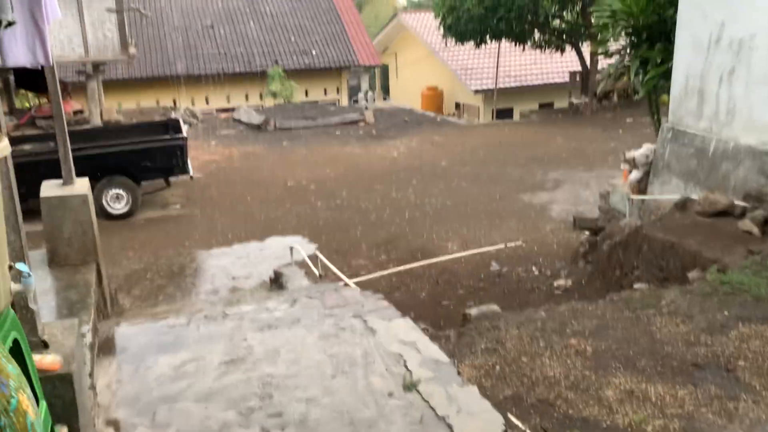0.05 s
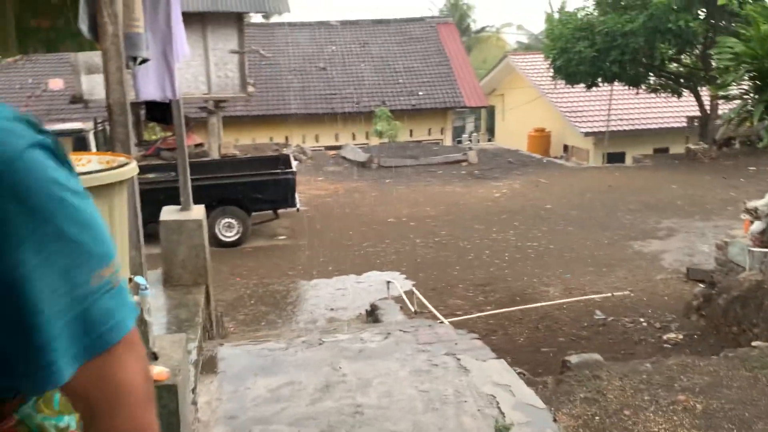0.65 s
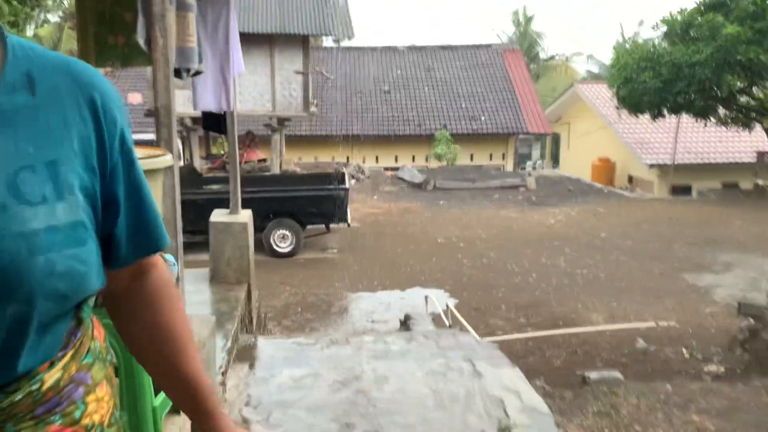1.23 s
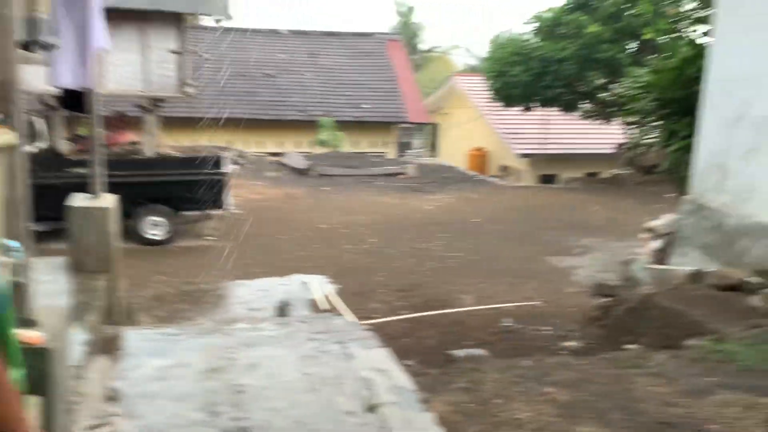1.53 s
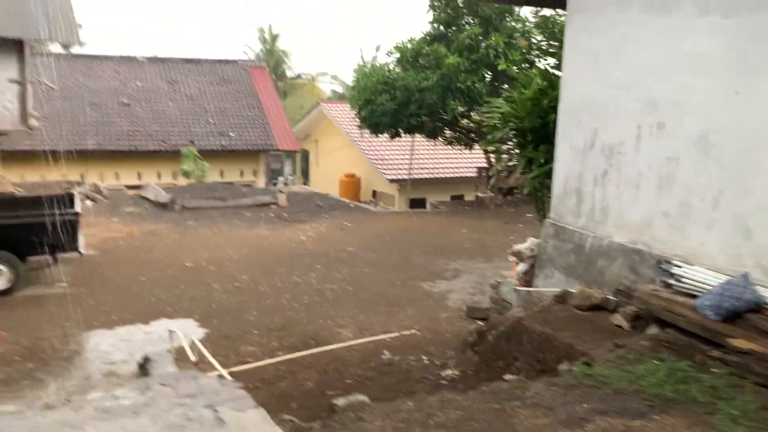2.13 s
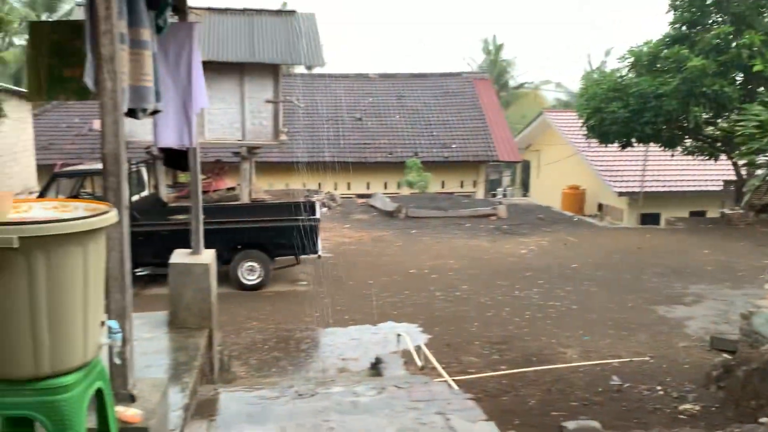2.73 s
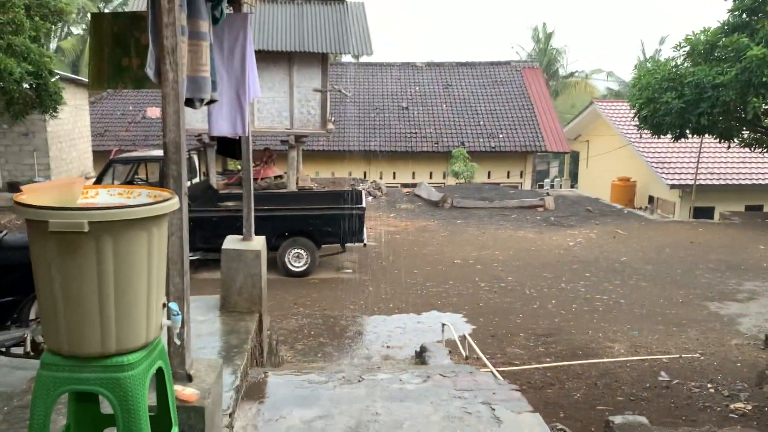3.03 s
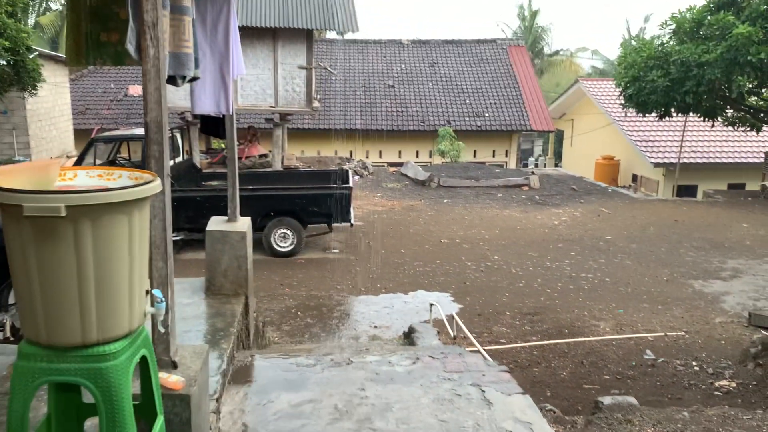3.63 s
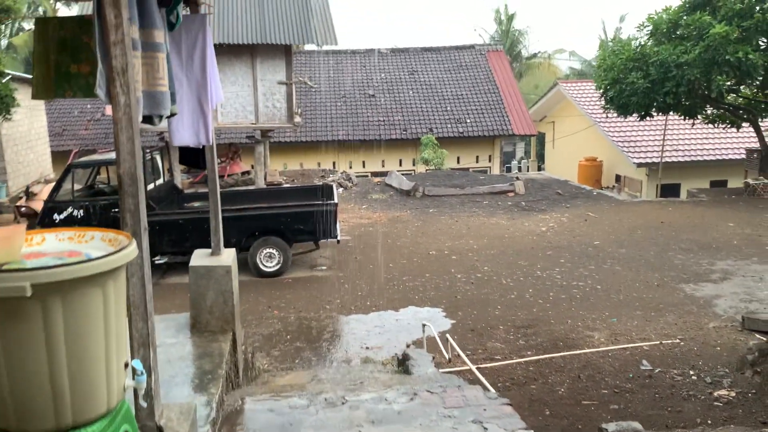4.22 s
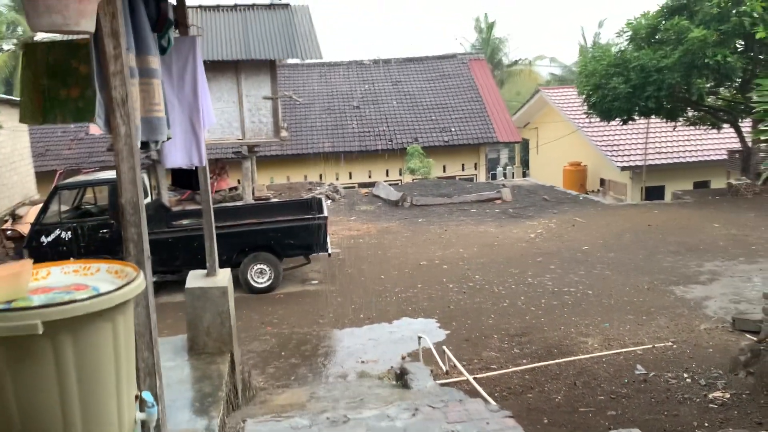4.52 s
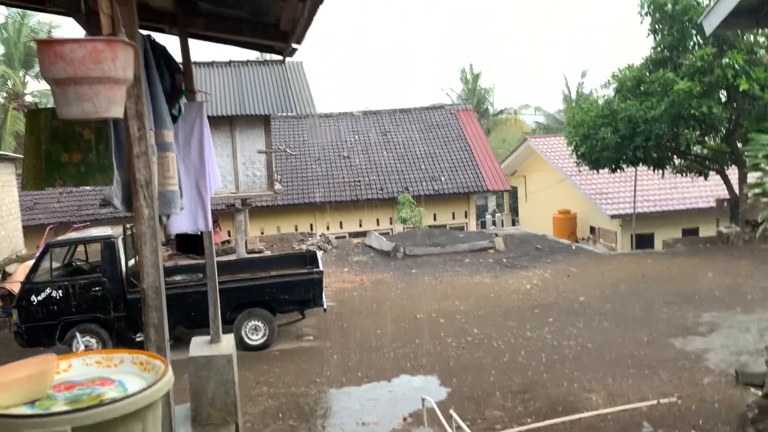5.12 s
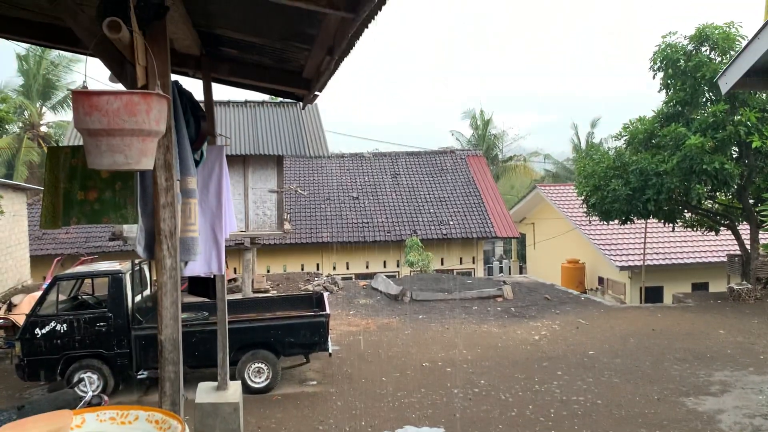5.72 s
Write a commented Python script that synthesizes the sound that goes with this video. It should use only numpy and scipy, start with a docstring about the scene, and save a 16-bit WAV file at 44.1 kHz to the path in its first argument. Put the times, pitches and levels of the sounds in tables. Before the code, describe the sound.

Slowly easing rain on rooftops, mud and puddles, heard from under the eaves, with sharp nearby drips over a faint rumble.

```python
"""A muddy village yard in steady, slowly easing rain, heard from under the eaves.
Drops drum the roofs into a hollow roar, patter on mud and wet concrete, and trap plinking air
bubbles in the puddles. A low rumble lies underneath. Close by, bigger drips smack down and two
drops plop into a puddle. Two microphone ports hear it all, with a lag that depends on pitch."""
import sys
import numpy as np
from scipy import signal
from scipy.fft import rfft, irfft, next_fast_len
from scipy.io import wavfile

SR = 44100
rng = np.random.default_rng(int(sys.argv[2]) if len(sys.argv) > 2 else 0)


def store_pcm(level_fs):
    """Save levels as 16-bit WAV."""
    pcm = np.round(np.clip(level_fs, -1, 1) * 32767).astype(np.int16)
    wavfile.write(sys.argv[1], SR, np.atleast_2d(pcm).T)


N = 258426
TIME = np.arange(N) / SR
FFT_SIZE = next_fast_len(N + 4096)
BINS_HZ = np.maximum(np.fft.rfftfreq(FFT_SIZE, 1 / SR), 1)


def from_db(db):
    """Decibels to gain."""
    return 10 ** (np.asarray(db) / 20)


def rms_one(x):
    """Scale to unit rms."""
    return x / np.sqrt(np.mean(x ** 2) + 1e-20)


def curve(points):
    """Draw a curve through (Hz, value) points on a log-frequency axis, one value per bin."""
    hz, values = np.transpose(points)
    return np.interp(np.log(BINS_HZ), np.log(hz), values)


def colour(x, gain):
    """Equalise with one gain per frequency bin."""
    return irfft(rfft(x, FFT_SIZE) * gain, FFT_SIZE)[..., :N]


def drift(rate_hz, hop=40):
    """A smooth random wander of unit rms, mostly slower than rate_hz."""
    pole = np.exp(-2 * np.pi * rate_hz * hop / SR)
    noise = rng.standard_normal(N // hop + 2002)
    slow = signal.lfilter([1], [1, -2 * pole, pole * pole], noise)[2000:]  # skip the filter's run-in
    return np.interp(np.arange(N) / hop, np.arange(len(slow)), rms_one(slow))


def easing(start_db, hold_s, db_per_s):
    """A fader in dB that holds, then sinks steadily."""
    return start_db - db_per_s * np.maximum(TIME - hold_s, 0)


def surges(rows):
    """A fader in dB made of bell-shaped swells and dips."""
    return sum(db * np.exp(-((TIME - s) / half_s) ** 2) for s, half_s, db in rows)


def add(out, sound, s):
    """Mix a short sound in at s seconds."""
    start = int(s * SR)
    slot = out[..., start:start + sound.shape[-1]]
    slot += sound[..., :slot.shape[-1]]


def impacts(per_s, spread_db):
    """Two independent streams of randomly timed drop hits: many small, a few large."""
    sizes = from_db(spread_db * np.minimum(rng.exponential(1, (2, N)), 4))
    hits = rng.random((2, N)) < per_s / SR
    return hits * sizes * rng.choice([-1, 1], (2, N))


def resonance(x, hz, width_hz):
    """A two-pole ring with unity gain at its peak."""
    r = np.exp(-np.pi * width_hz / SR)
    feedback = [1, -2 * r * np.cos(2 * np.pi * hz / SR), r * r]
    return signal.lfilter((1 - r * r) / 2 * np.array([1, 0, -1]), feedback, x + 1e-18)


def roofs(level_db=-4, swell_db=1.58, low_hz=110, high_hz=830):
    """Drops drum on the roofs; each hollow resonance takes its own hits and eases in its own time."""
    # Roof resonances. Each row: pitch in Hz, width in Hz, drive in dB, start of easing in seconds.
    modes = [(158.6, 63, -4, 1.03), (281, 51, -4, 2.2), (323, 26, -9.5, 2.3), (365, 36, -5, 1.95),
             (417.6, 45, -1.9, 1.2), (481.6, 39, 0.5, 0.51), (555, 55, -3, 0.95), (633, 62, -12.5, 2.4),
             (701, 57, -12, 3.3)]
    # Surges and lulls of the rain. Each row: middle in seconds, half length in seconds, change in dB.
    rain_surges = [(.58, 0.28, 0.6), (.81, 0.06, -2), (1.08, .16, 0.5), (1.8, 0.62, -1.6),
                   (4.45, 0.17, -2.5), (4.69, 0.048, 3), (5.55, 0.37, -1)]
    roar = 0
    for hz, width_hz, drive_db, hold_s in modes:
        blows = rms_one(impacts(per_s=2500, spread_db=3.0))
        blow_db = easing(drive_db, hold_s, db_per_s=1.5) + swell_db * drift(rate_hz=8.4)
        roar = roar + resonance(from_db(blow_db) * blows, hz, width_hz)
    # soft drops on a light sheet: no treble and no deep bass
    roar = signal.sosfilt(signal.butter(6, high_hz, "low", fs=SR, output="sos"), roar)
    roar = signal.sosfilt(signal.butter(3, low_hz, "high", fs=SR, output="sos"), roar)
    return from_db(level_db + surges(rain_surges)) * roar


def bubble(hz, cycles, rise=0.0184):
    """An air bubble trapped by a drop rings down to 1/e in `cycles` periods as its pitch creeps up."""
    age = np.arange(0, 6, hz / cycles / SR)  # in decay times
    return np.exp(-age) * np.sin(2 * np.pi * cycles * (age + rise * age ** 2 / 2))


def puddles(per_s=700, low_hz=1200, high_hz=4800, ring_s=0.018, range_db=14):
    """Small bubbles plink all over the flooded ground."""
    out = np.zeros((2, N))
    for when, pitch, size, stream in rng.random((int(per_s * N / SR), 4)):
        hz = low_hz + (high_hz - low_hz) * pitch
        plink = from_db(range_db * size ** 2) * bubble(hz, cycles=ring_s * hz)
        add(out[int(2 * stream)], plink, when * N / SR)
    return rms_one(out)


def yard(splash_s=0.00057, low_hz=660, top_hz=15100, spray_hz=5800, spray_follow=0.55):
    """Far drops merge into a wash; nearer ones stay separate splashes and bubbles."""
    # The tone of rain on mud and concrete. Each row: frequency in Hz, gain in dB.
    tone = [(800, 0.5), (1000, 0.6), (1550, 0), (1900, -2.5), (2550, -2.5), (2900, -9), (3700, -12),
            (5000, -19), (6500, -20.5), (7600, -22), (9500, -22.5), (11000, -26.5), (12700, -30.5),
            (13700, -26), (15000, -47)]
    wash = rng.standard_normal((2, N))
    hits = impacts(per_s=7000, spread_db=4.5)
    splash_energy = signal.lfilter([1], [1, -np.exp(-1 / (splash_s * SR))], hits ** 2 + 1e-18)
    splashes = rms_one(np.sqrt(splash_energy) * rng.standard_normal((2, N)))
    drops = wash + from_db(-7.5) * splashes + from_db(-10) * puddles()
    band = 1 / np.sqrt(1 + (low_hz / BINS_HZ) ** 12 + (BINS_HZ / top_hz) ** 120)
    patter = rms_one(colour(drops, from_db(curve(tone)) * band))
    level_db = easing(start_db=-29, hold_s=2.34, db_per_s=1.64)
    # the fine spray from close by fades less than the broad wash as the shower eases
    spray = colour(patter, 1 / (1 + (spray_hz / BINS_HZ) ** 6))
    spray_db = level_db + (1 - spray_follow) * (np.median(level_db) - level_db)
    return (patter - spray) * from_db(level_db) + spray * from_db(spray_db)


def low_rumble(level_db=-38.5, lumpy_db=2.5):
    """A bed of deep noise that swells unevenly and dips twice near the end."""
    # The rumble's tone. Each row: frequency in Hz, gain in dB.
    tone = [(12, -32), (20, -30), (30, -19), (45, -3.5), (65, -1.5), (95, -1), (130, -1), (200, -14),
            (400, -50), (1000, -100)]
    # Its fader moves. Each row: middle in seconds, half length in seconds, change in dB.
    dips = [(.1, .08, 0), (.38, 0.12, 0), (2.55, .25, 0), (4.15, 0.25, 0), (4.58, 0.095, -7),
            (5.5, .5, -1.5)]
    noise = colour(rng.standard_normal((2, N)), from_db(curve(tone)))
    rumble = rms_one(noise * from_db(lumpy_db * drift(rate_hz=8.7)))
    return from_db(level_db + surges(dips)) * rumble


def splash(low_hz, high_hz, smack_s, attack_s=0.0007, spatter_db=-11.5, spatter_stretch=6.1):
    """One drip: a sharp smack, then a softer, longer, uneven spatter of thrown droplets."""
    t = TIME[:SR // 10]
    lumps_db = np.interp(t, np.linspace(0, t[-1], num=70), rng.normal(0, 2.5, 70))
    smack = np.exp(-t / smack_s)
    spatter = from_db(spatter_db + lumps_db) * np.exp(-t / (spatter_stretch * smack_s))
    envelope = (1 - np.exp(-t / attack_s)) * (smack + spatter)
    burst = envelope * rng.standard_normal((2, len(t)))
    # a softer lower edge leaves the smack some body; the upper edge is steep
    burst = signal.sosfilt(signal.butter(5, low_hz, "high", fs=SR, output="sos"), burst)
    burst = signal.sosfilt(signal.butter(10, high_hz, "low", fs=SR, output="sos"), burst)
    return rms_one(burst) * np.sqrt(np.mean(envelope ** 2))


def drips(rows, rebound_s=0.013, rebound_db=-9):
    """Each drip splashes and throws up a droplet that lands a moment later."""
    out = np.zeros((2, N))
    for s, level_db, low_hz, high_hz, smack_s in rows:
        add(out, from_db(level_db) * splash(low_hz, high_hz, smack_s), s)
        add(out, from_db(level_db + rebound_db) * splash(low_hz, high_hz, smack_s), s + rebound_s)
    return out


def near_drips():
    """The clearest drips smack down close by."""
    # Drip cues. Each row: start in seconds, level in dB, low cut in Hz, high cut in Hz,
    # decay of the smack in seconds.
    cues = [(.238, -34, 3800, 5960, 0.0048), (.488, -38, 9000, 14200, .002), (.558, -33, 4100, 6600, .003),
            (.565, -26, 4200, 7000, .0016), (.571, -36, 4100, 7200, .006), (1.026, -34, 3900, 5600, .002),
            (2.799, -37, 9000, 13800, .0025), (2.836, -37, 4300, 7300, .004),
            (2.945, -44, 10000, 14000, .002), (3.494, -36, 10000, 14800, 0.0018),
            (3.794, -34, 7000, 9700, .001), (3.801, -28, 5200, 9800, .002),
            (3.807, -20.5, 7640, 9800, .0024), (3.810, -28, 3900, 12900, .0018),
            (3.822, -34, 6500, 9200, .0012), (4.044, -32, 6040, 14200, 0.0028),
            (4.045, -30.5, 3500, 6600, 0.003), (4.097, -32, 6000, 14500, .0022),
            (4.120, -33, 9500, 14000, .0016), (4.364, -41, 4000, 7000, .002),
            (4.770, -37, 9000, 14500, 0.0018), (4.819, -41, 8050, 13600, 0.0025),
            (5.060, -42, 10000, 13600, .002), (5.130, -43.5, 7000, 13000, 0.006),
            (5.172, -42, 4500, 8400, .005), (5.200, -34, 7550, 13600, 0.0016),
            (5.223, -43, 8000, 13500, .004), (5.440, -34, 5500, 15000, 0.0017),
            (5.812, -35, 6000, 15000, .0018), (5.837, -35.5, 5900, 14100, 0.0017)]
    return drips(cues)


def small_drips(per_s=16, softest_db=-45, range_db=5, low_hz=2800, high_hz=10500):
    """Faint ticks from the edge of the roof at random moments, few at first, then more and more."""
    top_hz, smack_s = 14000, 0.0014
    when, size, pitch = rng.random((int(per_s * N / SR), 3)).T
    starts_s = np.sqrt(when) * N / SR
    levels_db = softest_db + range_db * size ** 2
    low_cuts_hz = low_hz * (high_hz / low_hz) ** pitch
    return drips((s, db, hz, top_hz, smack_s) for s, db, hz in zip(starts_s, levels_db, low_cuts_hz))


def plops():
    """Big drops fall into a nearby puddle, each ringing one large bubble."""
    # Plop cues. Each row: start in seconds, level in dB, bubble pitch in Hz.
    cues = [(1.477, -22, 1026), (1.809, -23.5, 1725)]
    out = np.zeros((2, N))
    for s, level_db, hz in cues:
        add(out, from_db(level_db) * bubble(hz, cycles=9.8), s)
    return out


def ports(sound):
    """Two microphone ports: both hear stream 0, the right with a lag; only the right hears stream 1."""
    # How alike the ports sound. Each row: frequency in Hz, likeness from 0 to 1.
    likeness = [(40, .75), (85, .4), (135, .96), (570, .97), (670, .66), (745, .66), (820, .3), (2400, .24),
                (4600, .36), (6200, .88), (7400, .7), (8700, .25), (10500, .5), (11700, .93)]
    # The lag between them. Each row: frequency in Hz, lead of the left port in radians.
    left_lead = [(30, 1.1), (70, 1.8), (115, .7), (180, 1.5), (260, 2.9), (460, 6), (630, 7.6), (720, 9.5),
                 (800, 10.1), (1050, 8.3), (1200, 8.2), (1700, 5), (2200, 4.8), (3000, 2.9), (3700, 0),
                 (4500, -.2), (5000, 2.8), (5800, 6), (6700, 6.6), (7100, 9.2), (7600, 9.6), (9000, 14.8),
                 (10000, 12.9), (10800, 12.1), (11300, 9.8), (12200, 9.2), (12900, 6.5), (14100, 6.1),
                 (14700, 3.3)]
    # The right port is brighter just above 8 kHz. Each row: frequency in Hz, right minus left in dB.
    right_tone = [(60, .7), (280, -.9), (550, -.8), (900, 1.9), (3200, .9), (5200, 2.2), (6300, .4),
                  (7950, 0), (8030, 16), (8250, 13), (8430, 14.5), (8650, 9), (8870, 11), (9100, 6.5),
                  (9350, 7.5), (9700, 4), (10600, .8)]
    alike = np.clip(curve(likeness), 0, 0.99)
    gain = from_db(curve(right_tone))
    lead = np.interp(BINS_HZ, *np.transpose(left_lead))
    shared = colour(sound[0], gain * alike * np.exp(-1j * lead))
    right_only = colour(sound[1], gain * np.sqrt(1 - alike ** 2))
    return np.array([sound[0], shared + right_only])


def scene():
    """Roofs, yard, rumble and close drips, as the two ports hear them."""
    foreground = near_drips() + small_drips() + plops()
    return ports(roofs() + yard() + low_rumble() + foreground)


def record(dry):
    """A steep high cut takes off the very top."""
    cutoff_hz = 15700
    return signal.sosfilt(signal.ellip(10, 0.1, 90, cutoff_hz, fs=SR, output="sos"), dry)


dry = scene()
out = record(dry)
store_pcm(out)
```